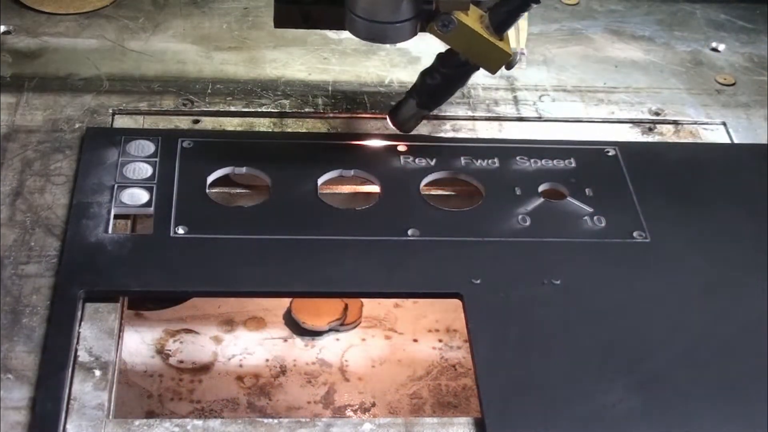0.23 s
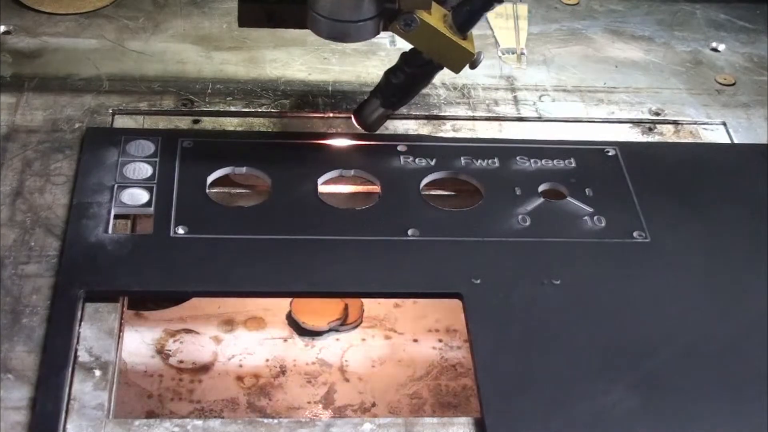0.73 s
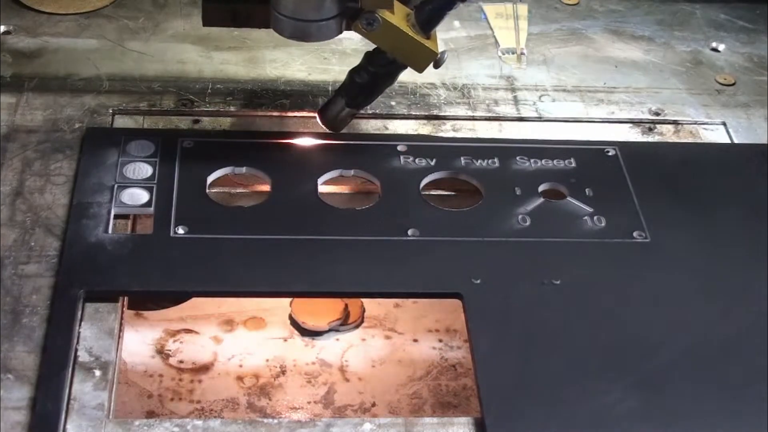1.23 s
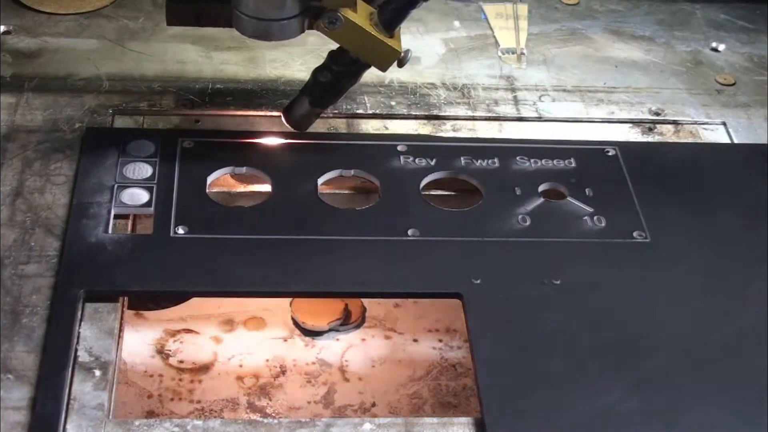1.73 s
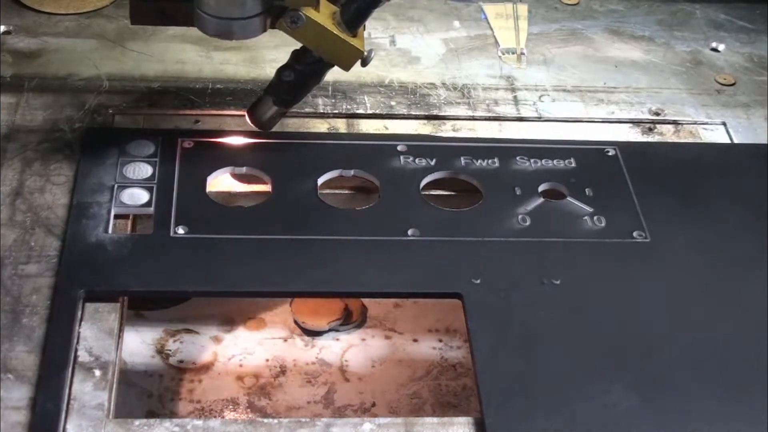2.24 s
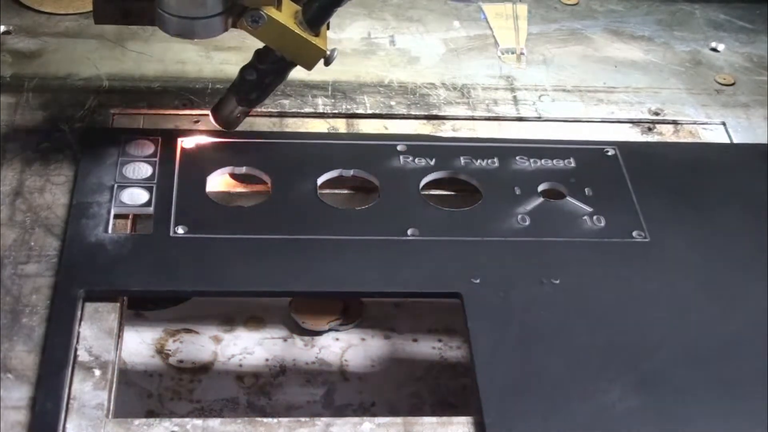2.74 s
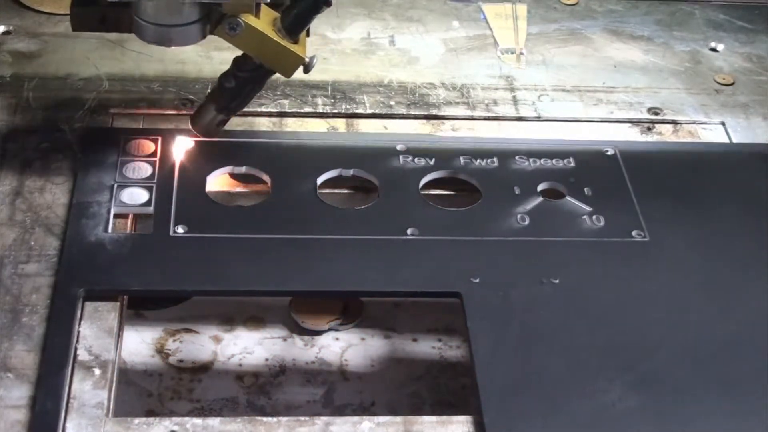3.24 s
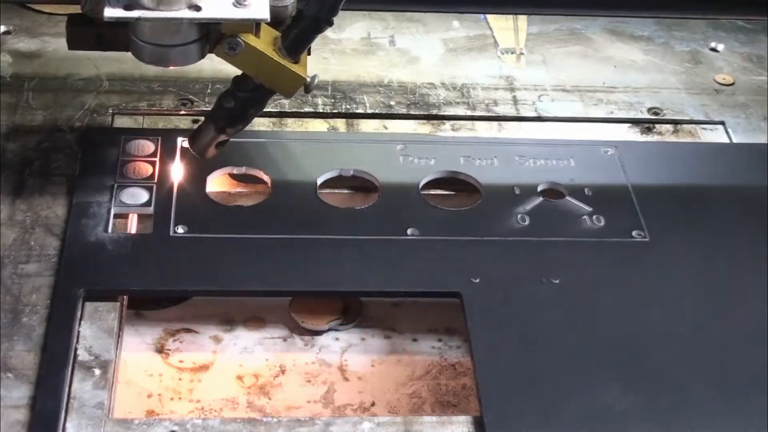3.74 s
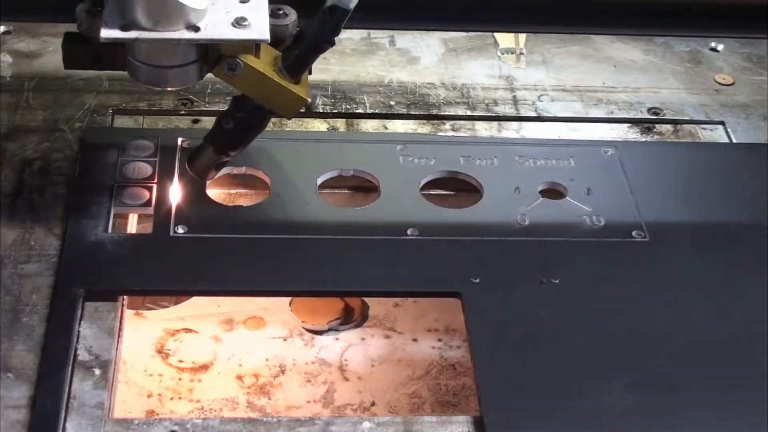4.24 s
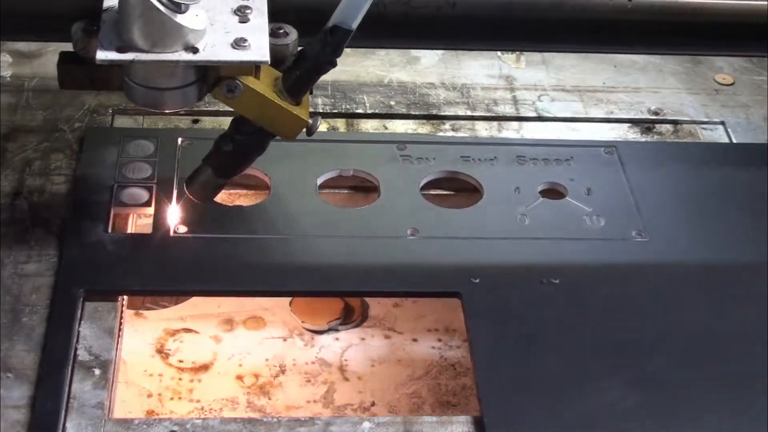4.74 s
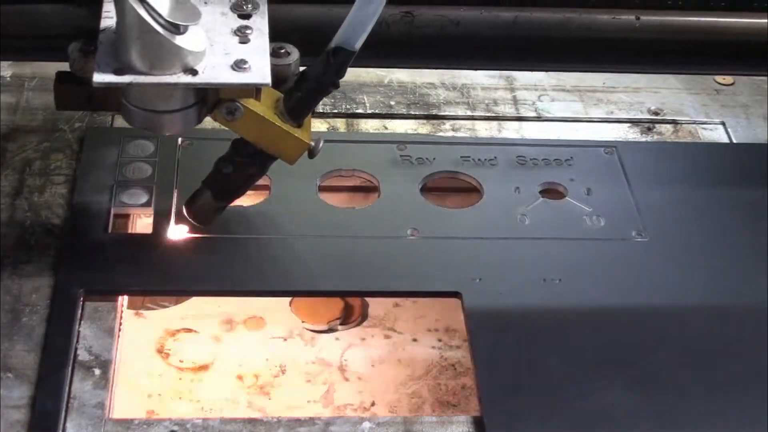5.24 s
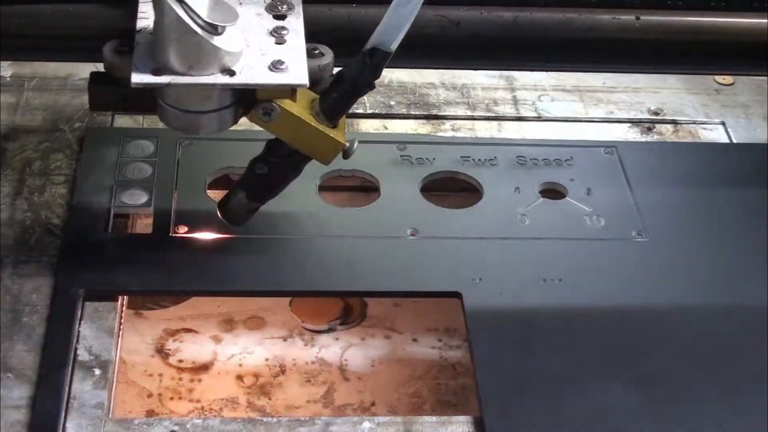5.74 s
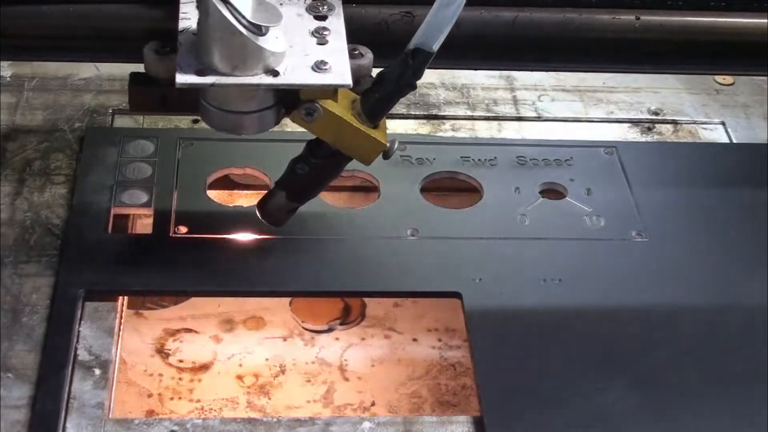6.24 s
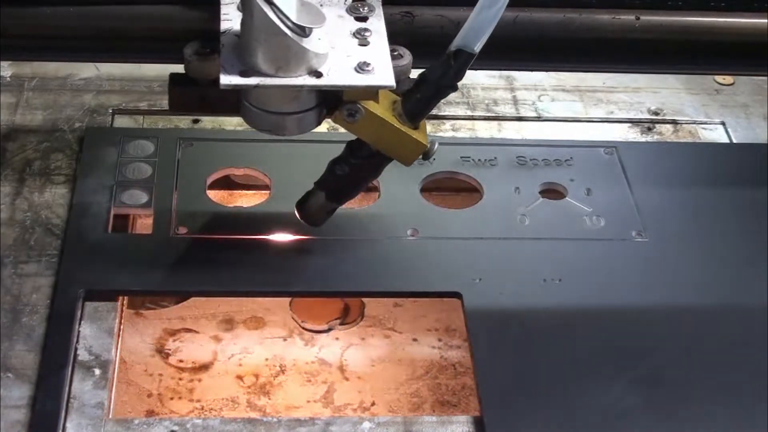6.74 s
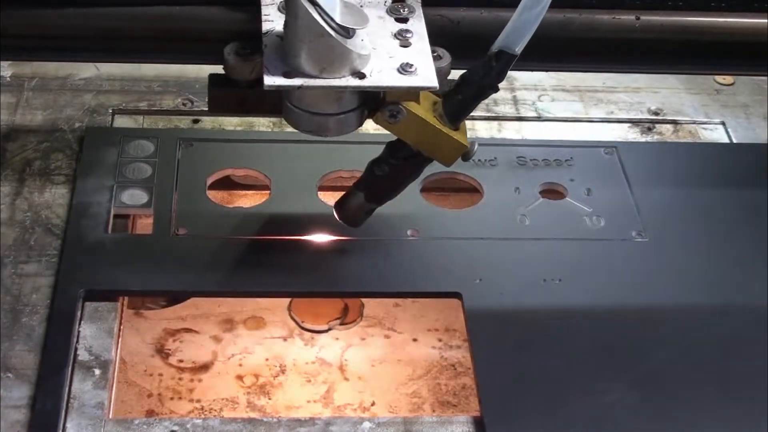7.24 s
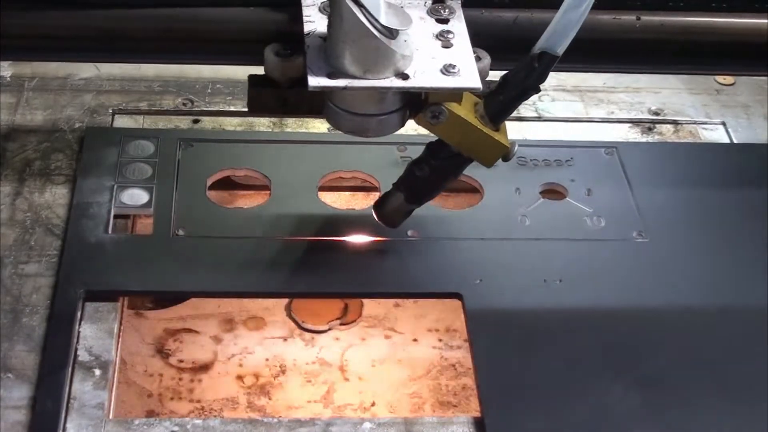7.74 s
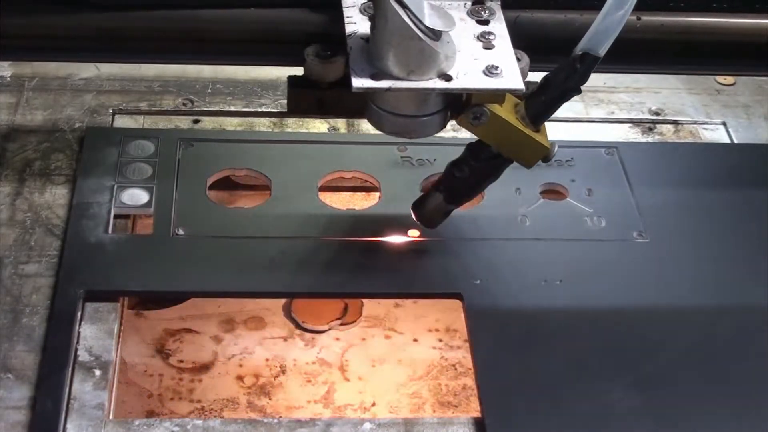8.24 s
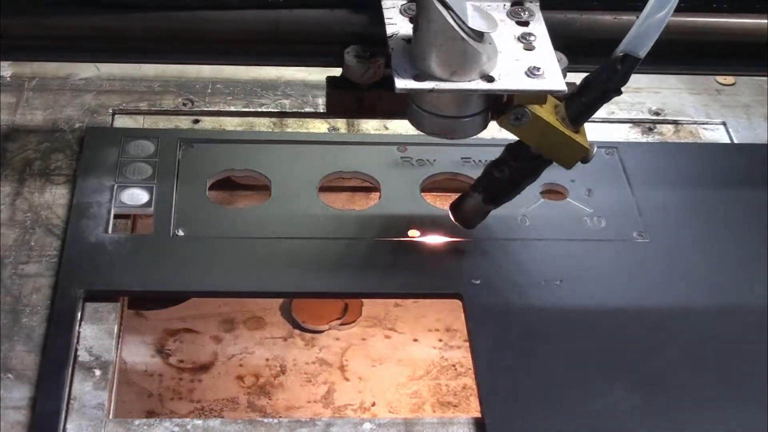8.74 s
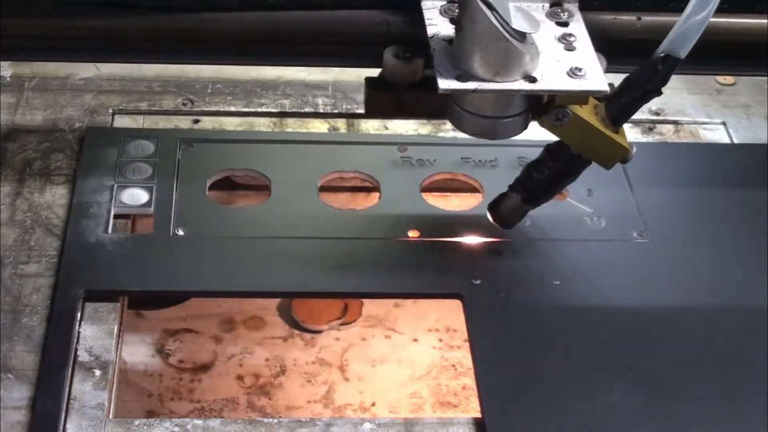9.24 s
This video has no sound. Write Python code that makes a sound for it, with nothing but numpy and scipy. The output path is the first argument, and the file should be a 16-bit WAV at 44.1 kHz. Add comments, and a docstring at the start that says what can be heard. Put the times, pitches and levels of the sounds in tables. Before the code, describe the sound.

Steady rushing air and a fine, bright sizzle come from a laser cutting a plastic panel, close to the microphone in a workshop. The beam whines and buzzes on fixed pitches, while the hiss shifts in colour and swells slightly over a soft low rumble. Midway, a single sharp click crackles out with a small low thud. The hiss and whine then continue, the sizzle flaring briefly near the end.

```python
"""A laser cutter traces the outline of a plastic panel, heard from close by in a workshop.
The beam pulses with the mains ripple, so the melt sizzles in rapid puffs and the cut whines and
buzzes on steady tones. Assist air rushes and hoots through the slot, rumbles on the bed and whistles
at the panel's edge, while the gantry shudders underneath. Midway comes one sharp, crackling click."""
import sys
import numpy as np
from scipy import signal
from scipy.fft import rfft, irfft
from scipy.io import wavfile
from scipy.ndimage import uniform_filter1d

SR = 44100
rng = np.random.default_rng(int(sys.argv[2]) if len(sys.argv) > 2 else 0)


def wrap_up_sound(samples):
    """Save the sound to the file named by the first command line argument, as 16-bit audio."""
    columns = np.atleast_2d(samples).T
    # keep every value between -1 and 1, then stretch to whole-number steps
    tamed = np.clip(columns, -1, 1)
    steps = np.round(tamed * 32767).astype(np.int16)
    wavfile.write(sys.argv[1], SR, steps)


N = 418068
TIME, FREQ = np.arange(N) / SR, np.fft.rfftfreq(N, 1 / SR)
RIPPLE_HZ = 299.92


def from_db(db):
    """Decibels to gain."""
    return 10 ** (np.asarray(db) / 20)


def unit(x):
    """Scales to rms 1."""
    return x / np.sqrt(np.mean(x ** 2) + 1e-20)


def across(points):
    """A curve of (Hz, value) points, read at every frequency bin."""
    hz, value = np.transpose(points)
    return np.interp(np.log(FREQ + 1), np.log(hz + 1), value)


def bursts(rows, edge_s):
    """Gain envelope of events (start s, end s, dB) that rise, hold and fall."""
    return sum(from_db(db) * np.clip(.5 + np.minimum(TIME - start, end - TIME) / edge_s, 0, 1)
               for start, end, db in rows)


def held(rows, column):
    """One column of a table of events, held through each and gliding between them."""
    edges = np.sort([s for row in rows for s in row[:2]])
    return np.interp(TIME, edges, np.repeat([row[column] for row in rows], 2))


def drift(rate):
    """Slow random modulation of rms 1, with up to about rate swings a second."""
    spectrum = rng.standard_normal(2048) + 1j * rng.standard_normal(2048)
    slow = unit(irfft(spectrum / (1 + (np.arange(2048) * SR / N / rate) ** 4)))
    return np.interp(TIME, np.linspace(0, N / SR, len(slow)), slow)


def rush(colour_db, gate=1):
    """Gated, coloured stereo noise, a little wide in the bass and centred in the treble; rms 1."""
    # Stereo likeness. Each row: frequency in Hz, correlation of left and right.
    likeness = [(30, .76), (250, .8), (700, .92), (2600, .95), (3300, 1)]
    same = across(likeness)
    a, b = rfft(rng.standard_normal((2, N)) * gate)
    mid, side = a * np.sqrt((1 + same) / 2), b * np.sqrt((1 - same) / 2)
    return unit(irfft(np.array([mid + side, mid - side]) * from_db(colour_db), N))


def resonate(x, hz, width_hz):
    """A steep resonance that follows the curve hz; rms 1."""
    turn = np.exp(2j * np.pi * np.cumsum(hz) / SR)
    r = np.exp(-np.pi * width_hz / SR)
    return unit((turn * signal.lfilter([(1 - r) ** 2], [1, -2 * r, r * r], x / turn)).real)


def tone(hz, db, waver_db=0.54, wobble_rad=0.091):
    """A nearly pure tone that wavers a little in level and phase."""
    phase = 2 * np.pi * (hz * TIME + rng.random()) + wobble_rad * drift(7.5)
    return np.sqrt(2) * from_db(db + waver_db * drift(8.9)) * np.sin(phase)


def beam(sharpness=1.55, rest=0.31, sag_depth=0.61, pulses_per_group=10, flutter_db=0.95):
    """Strength of the beam: an uneven puff on each ripple crest, sagging once in every group."""
    cycles = RIPPLE_HZ * TIME + 0.033 * drift(0.99)
    size = from_db(1.3 * rng.standard_normal(4096))[np.floor(cycles).astype(int)]
    puff = np.exp(-sharpness * (1 + np.cos(2 * np.pi * cycles)))
    sag = np.exp(6.1 * (np.cos(2 * np.pi * cycles / pulses_per_group) - 1))
    return unit((rest + size * puff) * (1 - sag_depth * sag) * from_db(flutter_db * drift(5.6)))


def air_jet(pulses, flow_db, usual_db=-31.5):
    """Assist air rushes through the slot, lightly pulsed by the beam, and rings the housing."""
    # Colour of the jet. Each row: frequency in Hz, relative level in dB.
    colour = [(300, -18), (600, -6.5), (740, -0.5), (900, -3), (1150, -5), (1450, 0), (1900, -2),
              (2700, -3), (3700, -5), (4700, -4), (6500, -7.5), (9000, -9.5), (16000, -44)]
    # Housing resonances. Each row: frequency in Hz, width in Hz, boost in dB.
    housing = [(1360, 130, 4), (2074, 66, 3.5), (2400, 140, 2), (3325, 200, 4), (4140, 140, 1.5)]
    housing_db = sum(db / (1 + (2 * (FREQ - hz) / width) ** 2) for hz, width, db in housing)
    level = from_db(usual_db + flow_db + 0.43 * drift(7.4))
    return level * rush(across(colour) + housing_db, gate=1.9 + pulses)


def reflect(x):
    """Nearby surfaces mirror the hiss; the paths wander, so soft peaks shift through the treble."""
    # Reflections off the panel, the head and the bed's walls. Each row: mean delay in seconds, gain.
    mirrors = [(.00035, .13), (.0007, .14), (.0013, .15), (.0024, .14)]
    out = x.copy()
    for delay, gain in mirrors:
        late = TIME - delay * np.exp(.04 * drift(.6))
        out += gain * np.array([np.interp(late, TIME, channel) for channel in x])
    return unit(out)


def melt_sizzle(pulses, flow_db, front, usual_db=-33):
    """The melt spits bright puffs of vapour, flaring at times and softer at the panel's front."""
    # Colour of the sizzle. Each row: frequency in Hz, relative level in dB.
    colour = [(1500, -27), (3500, -4.5), (6000, -4.5), (8800, -1.5), (9800, -0.5), (10300, 0), (11300, -2),
              (11900, 0), (13500, -1.5), (15800, -1.5), (17000, -23)]
    # Flares of the melt. Each row: start and end in seconds, boost in dB.
    flares = [(.75, 1.07, 1.7), (1.68, 1.95, 1), (5.14, 5.34, 4.5), (5.38, 5.72, 1.8), (8.19, 8.6, 5),
              (8.655, 9.1, 2.5)]
    flare_db = sum(db * bursts([(start, end, 0)], edge_s=0.13) for start, end, db in flares)
    level = from_db(usual_db + 0.42 * flow_db - 0.95 * front + flare_db)
    return level * reflect(rush(across(colour), gate=pulses))


def bed_rumble(flow_db, front, usual_db=-46.5, flutter_db=1.5):
    """Air strikes the bed: a low draught that follows the flow, with fluttering gusts on top."""
    # Colour of the rumble. Each row: frequency in Hz, relative level in dB.
    colour = [(15, -5), (35, 0), (70, -5.5), (150, 0), (450, 0), (700, -5.5), (1500, -13.5), (5000, -45)]
    # Gusts on the bed. Each row: start and end in seconds, mean level in dB.
    gusts = [(.5, 1.05, -48), (1.75, 2.1, -53), (2.15, 2.53, -46), (3.52, 3.88, -45.5), (4.5, 4.87, -45.5),
             (5.3, 6.17, -51.5), (6.2, 6.88, -40.5), (6.92, 7.15, -45.5), (7.2, 7.78, -41.5),
             (7.82, 8.25, -46), (9.0, 9.42, -52)]
    draught = from_db(usual_db + 0.91 * flow_db + 0.04 * front)
    gusting = bursts(gusts, edge_s=.12) * from_db(flutter_db * drift(9))
    return np.hypot(draught, gusting) * rush(across(colour))


def slot_hoots(pulses, flow_db, idle_db=-49):
    """The puffs sound the slot's hollow resonance, at a new pitch in each hoot."""
    # Hoots of the slot. Each row: start and end in seconds, pitch in Hz, level in dB.
    hoots = [(-.1, .38, 5760, -37.5), (0.413, 1.08, 3920, -36.5), (1.2, 2.55, 4200, -40),
             (3.85, 4.25, 8850, -44), (4.45, 4.82, 5900, -37), (5.12, 5.5, 5800, -41),
             (5.55, 5.855, 4750, -35), (5.87, 6.87, 5600, -36), (7.0, 7.556, 4600, -38.5),
             (7.57, 8.26, 5160, -36), (8.98, 9.6, 8300, -40.5)]
    swells = bursts([(start, end, db) for start, end, _, db in hoots], edge_s=0.17)
    level = np.hypot(swells, from_db(idle_db + flow_db))
    return level * resonate(pulses * rng.standard_normal(N), held(hoots, 2), width_hz=1950)


def beam_whine(swell_db, trim_db=0.16):
    """The pulsed beam whines on a cluster of steady pitches."""
    # Partials of the whine. Each row: frequency in Hz, level in dB before trim and swell.
    partials = [(715.0, -60.6), (814.2, -61.2), (871.4, -50.0), (1257.4, -58.9), (1356.7, -41.9),
                (1372.3, -54.6), (1414.1, -51.8), (1471.4, -38.0), (1528.8, -52.4), (1628.2, -57.3),
                (2071.5, -46.2), (2128.9, -51.4), (2228.2, -53.6), (2327.2, -56.1), (2342.9, -45.4),
                (2442.1, -59.3), (3527.5, -43.3), (3543.0, -55.0), (4070.2, -52.0), (4127.6, -42.5),
                (4456.2, -57.6), (4727.6, -49.6), (4784.9, -59.5), (5599.0, -57.1), (6783.7, -56.9),
                (8255.0, -55.2)]
    return sum(tone(hz, db + trim_db + swell_db) for hz, db in partials)


def ripple_buzz(swell_db, front, trim_db=0.7, low_follow=1.33):
    """Harmonics of the mains ripple; three low ones swell further and shift as the head travels."""
    # Buzz harmonics. Each row: multiple of the ripple, level in dB before trim and swell.
    harmonics = [(1, -60), (5, -49), (6, -50.5), (7, -50), (8, -45), (9, -58), (10, -58), (11, -56),
                 (12, -58), (18, -55), (20, -56)]
    # Harmonics 2, 3 and 4. Each row: base level in dB with the head at the back, halfway, at the front.
    low_harmonics = [(-54.5, -48, -48.5), (-49.5, -51, -45.5), (-52.5, -52, -57)]
    buzz = sum(tone(k * RIPPLE_HZ, db + trim_db + swell_db) for k, db in harmonics)
    gains = [from_db(np.interp(front, [0, .5, 1], dbs) + low_follow * swell_db) for dbs in low_harmonics]
    singing = bursts([(4.12, 5.22, -44.5)], edge_s=0.19)  # the fourth sings out near the front
    gains[-1] = np.hypot(gains[-1], singing)
    return buzz + sum(gain * tone(k * RIPPLE_HZ, 0) for k, gain in enumerate(gains, 2))


def edge_whistle():
    """Air whistles at the panel's edge; its pitch scatters quickly, widening it into a thin hiss."""
    # Faint whistles. Each row: start and end in seconds, pitch in Hz, level in dB, width in Hz.
    whistles = [(-.1, 1.8, 14400, -50, 500), (3.22, 4.0, 15400, -37.5, 1200), (5.2, 5.35, 14800, -45, 800),
                (8.2, 9.0, 15170, -43, 240)]
    level = bursts([(start, end, db) for start, end, _, db, _ in whistles], edge_s=.1)
    scatter = unit(uniform_filter1d(rng.standard_normal(N), size=48))
    hz = held(whistles, 2) + held(whistles, 4) / 2 * scatter
    return level * unit(np.sin(2 * np.pi * np.cumsum(hz) / SR))


def gantry_shudder(hz=70, width_hz=50, idle_db=-59.5):
    """The moving frame shudders at its lowest resonance."""
    # Shudders of the gantry. Each row: start and end in seconds, level in dB.
    shudders = [(.25, .36, -45), (2.12, 2.53, -52.5), (5.55, 6.2, -56.5), (6.25, 8.2, -50.5)]
    level = np.hypot(from_db(idle_db), bursts(shudders, edge_s=.06))
    return level * resonate(rng.standard_normal(N), np.full(N, hz), width_hz)


def click(start_s=5.3635, end_s=5.4275, rise_s=0.00038, ring_rise_s=0.0025, floor_db=-24):
    """Five quick spits keep a low ring going over a bed of crackle; it starts and stops dead."""
    # Spits. Each row: start in seconds, crackle level in dB, decay in seconds, ring strength in dB.
    spits = [(5.364, -17, 0.0077, -0.5), (5.373, -11, 0.02, -2), (5.391, -8, 0.0076, -7),
             (5.4085, -9, 0.0096, 1), (5.4251, -8.5, 0.0055, -19)]
    # Colour of the crackle. Each row: frequency in Hz, relative level in dB.
    colour = [(80, -32), (150, -2), (400, -3), (570, -5.5), (750, -9.5), (1200, -7.5), (3200, -11),
              (5000, -10), (8500, -11.5), (10400, -10.5), (12000, -20), (15800, -32)]
    # Modes of the low ring. Each row: frequency in Hz, relative level in dB, seconds to fall 60 dB.
    modes = [(287, -8, 0.074), (145.7, -24.5, 0.11), (431, -22, 0.12), (716, -22.5, 0.15),
             (833, -21.5, 0.1)]
    power, ring = np.full(N, from_db(floor_db) ** 2), np.zeros(N)
    since = TIME - start_s
    for onset, db, decay, ring_db in spits:
        age = np.clip(TIME - onset, 0, 1)
        power += (from_db(db) * (1 - np.exp(-age / rise_s)) * np.exp(-age / decay)) ** 2
        thud = sum(from_db(mode_db - 60 * age / t60) * np.sin(2 * np.pi * hz * since)
                   for hz, mode_db, t60 in modes)
        ring += from_db(ring_db) * (1 - np.exp(-age / ring_rise_s)) * thud
    crackle = np.sqrt(power) * rush(across(colour))
    inside_s = np.minimum(since, end_s - TIME)
    return np.clip(inside_s / rise_s, 0, 1) * crackle + np.clip(inside_s / ring_rise_s, 0, 1) * ring


def scene():
    """Beam, air flow and the head's place drive the cut; whistle, gantry and click join it."""
    # How hard the air jet blows. Each row: time in seconds, dB over its usual level.
    flow = [(0, 1), (1.03, 1.5), (1.12, -0.45), (2.05, -0.54), (2.48, 0.4), (2.6, -1.1), (3.2, -0.6),
            (3.35, -2.5), (3.64, -3.5), (3.82, -0.1), (4.6, 0.65), (5.45, -2.5), (5.9, 0), (6.85, 1.3),
            (6.94, -0.5), (7.3, 1.4), (8.24, 1), (8.31, -3.5), (8.76, -2.5), (9.0, 1.5), (9.48, 2)]
    flow_db = np.interp(TIME, *np.transpose(flow))
    front = np.interp(TIME, [3.1, 5.2], [0, 1])  # the head crosses from the back edge to the front
    swell_db = 1.32 * uniform_filter1d(flow_db, size=4000)  # the tones swell and fade with the jet
    pulses = beam()
    cut = air_jet(pulses, flow_db) + melt_sizzle(pulses, flow_db, front)
    cut += bed_rumble(flow_db, front) + slot_hoots(pulses, flow_db)
    tones = beam_whine(swell_db) + ripple_buzz(swell_db, front)
    return cut + tones + edge_whistle() + gantry_shudder() + click()


def record(dry, ceiling=.85, cutoff_hz=15850):
    """Two microphone ports differ in level and phase; peaks round off and the top treble is cut."""
    # Level between the ports. Each row: frequency in Hz, dB by which the left is louder.
    left_level = [(60, 2), (1400, 2), (2400, 1.5), (3300, 0)]
    # Phase between the ports. Each row: frequency in Hz, radians by which the left leads.
    left_phase = [(0, 0.17), (430, 0.37), (860, 0.69), (1120, 0.63), (1460, 0.64), (2410, 0.79), (3190, 0)]
    side = np.array([[.5], [-.5]])
    ports = from_db(side * across(left_level)) * np.exp(1j * side * across(left_phase))
    heard = irfft(rfft(dry) * ports, N)
    rounded = heard / (1 + (heard / ceiling) ** 6) ** (1 / 6)
    lowpass = signal.firwin(1023, cutoff_hz, window=("kaiser", 9), fs=SR)
    return signal.oaconvolve(rounded, lowpass[None], "same")


dry = scene()
out = record(dry)
wrap_up_sound(out)
```